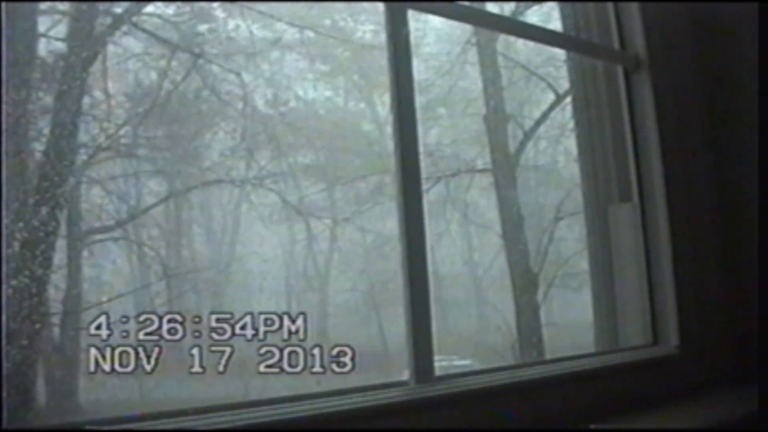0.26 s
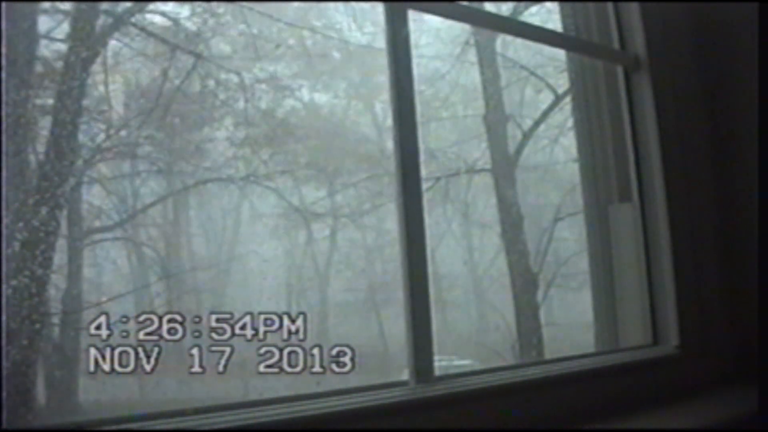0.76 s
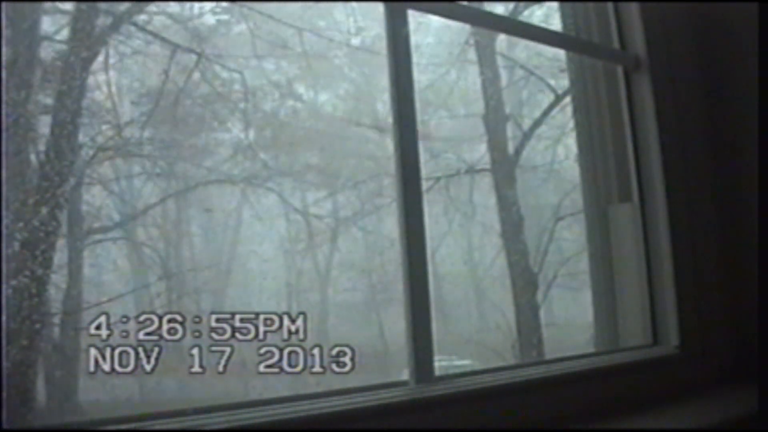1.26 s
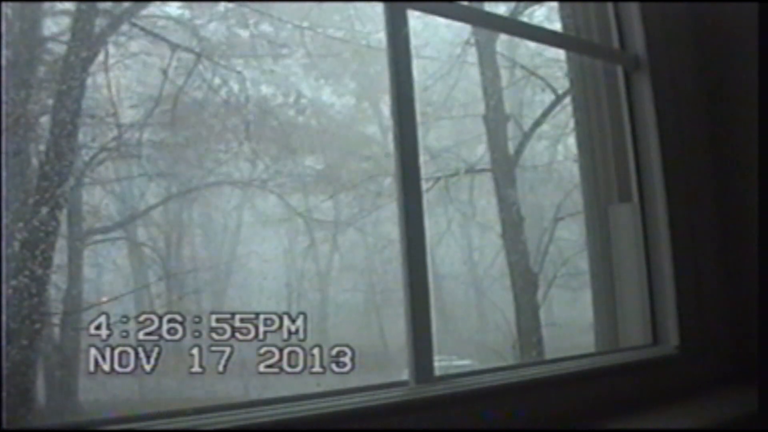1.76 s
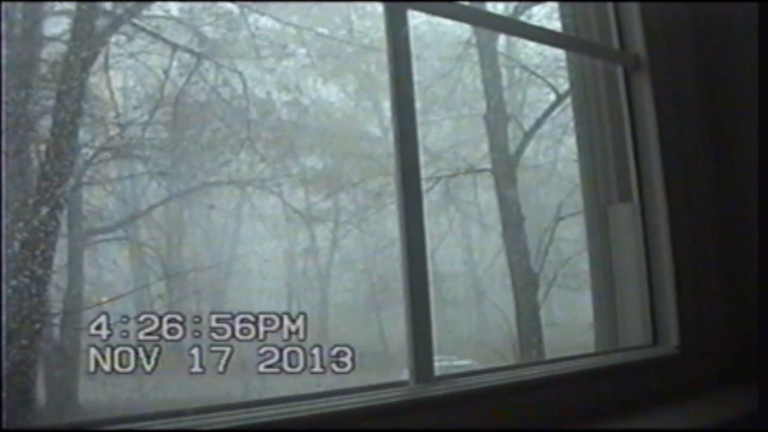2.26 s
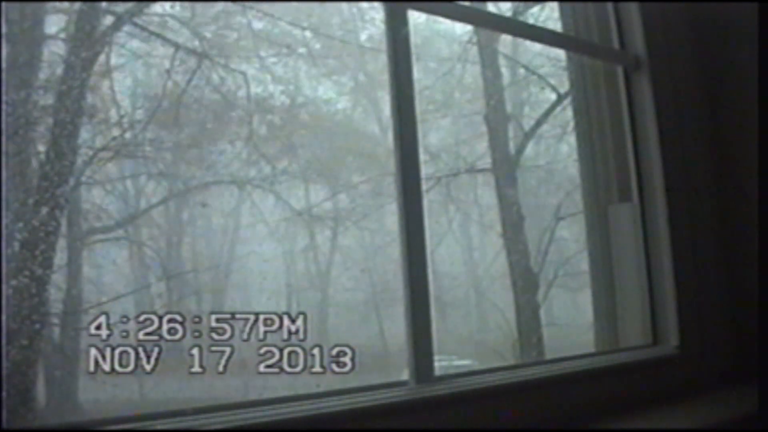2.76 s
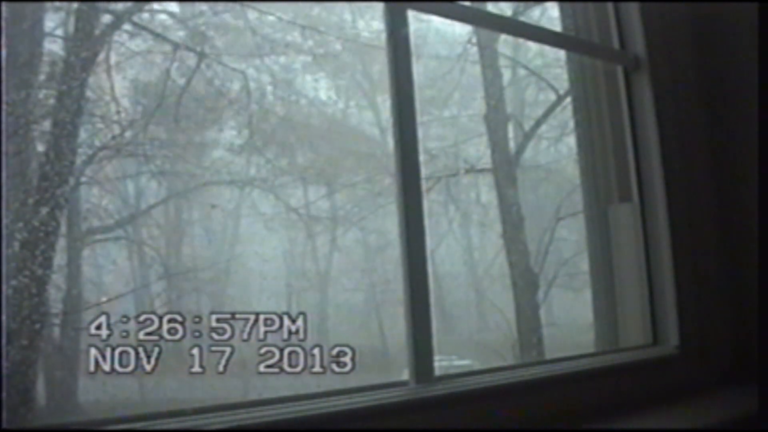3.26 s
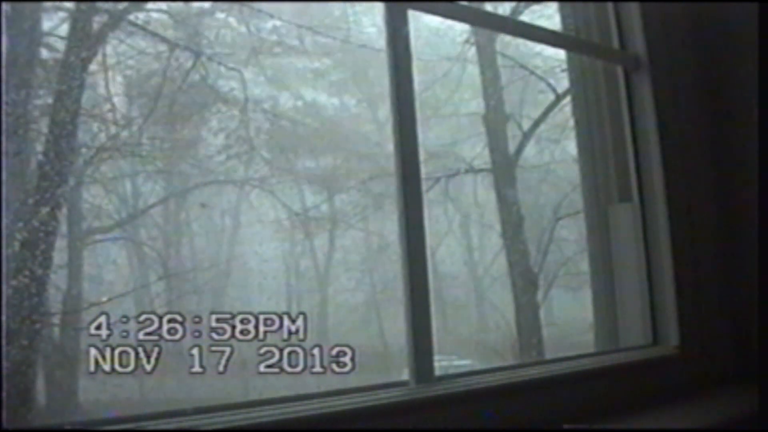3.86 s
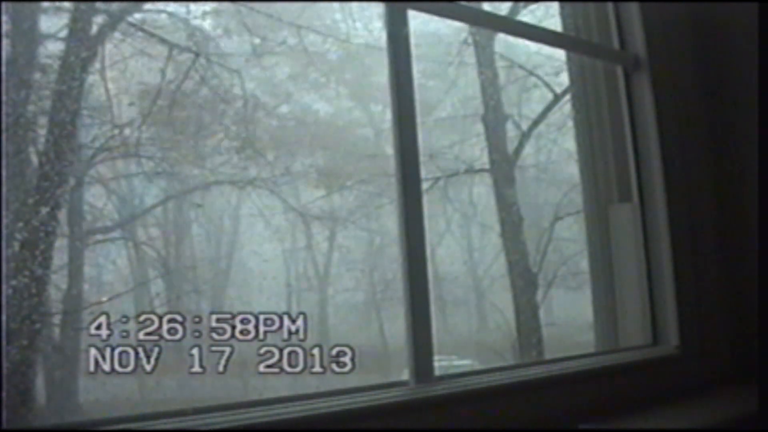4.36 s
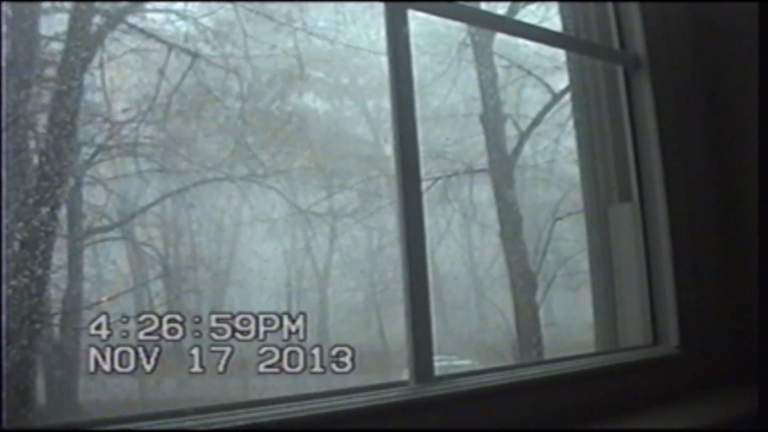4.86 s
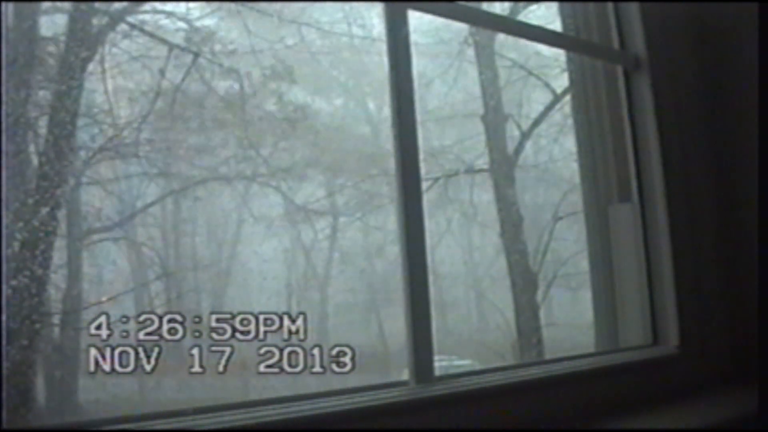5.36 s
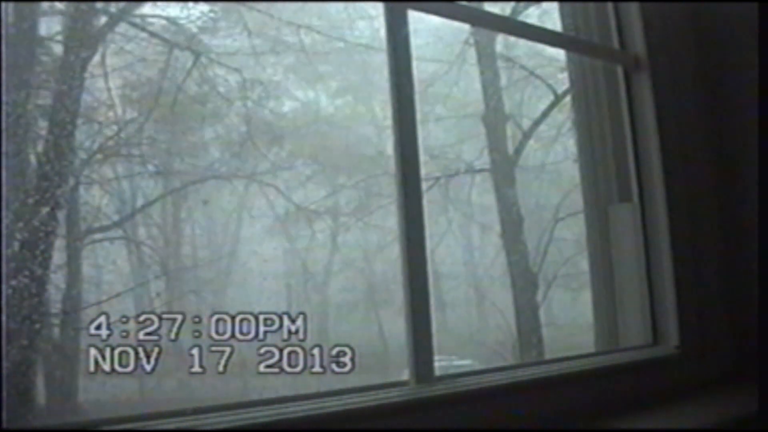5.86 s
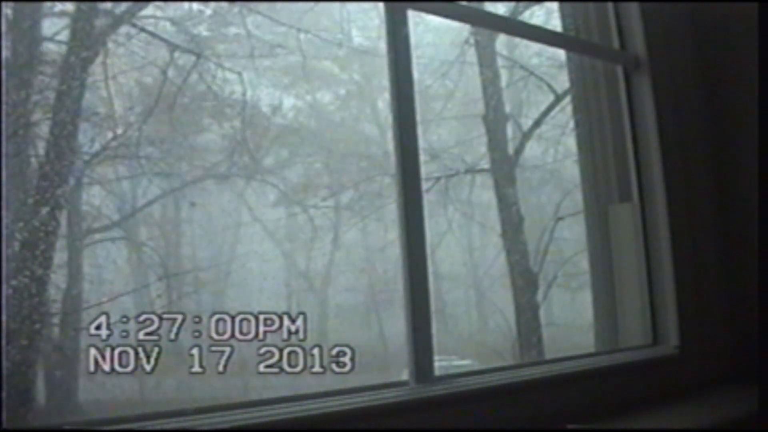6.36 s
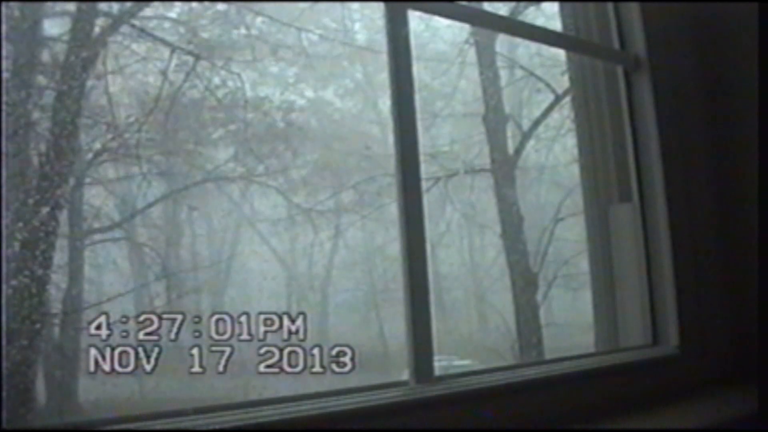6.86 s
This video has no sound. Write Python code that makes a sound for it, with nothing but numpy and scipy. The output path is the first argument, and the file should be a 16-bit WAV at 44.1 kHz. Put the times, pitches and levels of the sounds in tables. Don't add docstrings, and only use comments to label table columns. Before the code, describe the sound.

Steady strong wind heard through window glass, muffled and dark, already blowing at the start and still going at the end. Uneven buffets make the pane boom around a low-mid pitch, some short, some swelling for half a second. Breathier air whispers through gaps. Cheap camcorder sound: treble cut off, slightly watery and grainy, faint motor whine, nearly everything in the left channel, the right almost silent.

```python
import sys
import numpy as np
from scipy import signal
from scipy.fft import rfft, irfft
from scipy.io import wavfile
from scipy.ndimage import uniform_filter1d

SR = 44100
rng = np.random.default_rng(int(sys.argv[2]) if len(sys.argv) > 2 else 0)


def generate_wav(signal):
    frames = np.transpose(np.atleast_2d(signal))
    scaled = np.clip(frames, -1, 1) * 32767
    pcm = np.round(scaled).astype(np.int16)
    wavfile.write(sys.argv[1], SR, pcm)


def level_to_linear(level):
    exponent = np.asarray(level, float) / 20
    return 10 ** exponent


N = 313992

# (frequency [Hz], density [dB per Hz])
IDLE_HISS = [(20, 0), (150, -4), (1000, -11), (4000, -15), (10500, -18), (20000, -20)]
# (multiple of the rotation rate [1], level [dB rms])
GEAR_HARMONICS = [(14, -64.5), (16, -65.5), (18, -71), (19, -73), (20, -70), (21, -71.5)]
DRUM_HARMONICS = [(18, -63.5), (24, -75.5), (30, -72.5), (45, -77), (48, -81.5)]
# (frequency [Hz], level [dB rms])
CASE_TONES = [(1681.8, -70), (2043, -74), (3650, -76.5)]
# (time [s], level [dB])
WIND = [(0, -51.5), (.35, -52), (.85, -51.5), (1.7, -52), (2.6, -52), (3.3, -51.5), (3.75, -51.5),
        (4.25, -50), (4.6, -50.5), (5.3, -50), (6.0, -50.5), (6.3, -50.5), (7.0, -51.5), (7.12, -50.5)]
# (frequency [Hz], density [dB per Hz])
LEAK_SPECTRUM = [(530, -20.5), (900, -5.5), (967, -11.5), (1100, -2.5), (1600, -10.5), (1770, -8.5),
                 (1920, -12), (2080, -10), (2220, -11.5), (3080, -15.5), (4010, -13.5), (5630, -17.5),
                 (7100, -23), (9000, -26.5), (11300, -29.5)]
# (frequency [Hz], width [Hz], level [dB])
GLASS_MODES = [(347.3, 36, -3.5), (382.3, 23.5, 0), (405.8, 19, -1.5), (446.7, 25.8, -3), (474.3, 29, -8),
               (533.7, 43, -8), (603, 37.4, -9), (671, 77, -11.5), (728, 24, -27), (781.5, 34, -17.5),
               (802, 30, -20.5), (885, 66, -20.5)]
# (frequency [Hz], width [Hz], level [dB])
WALL_MODES = [(29.6, 8, -33), (50, 7.6, -24), (72.7, 34, -26), (95.5, 15.7, -9.5), (130, 17, -12),
              (155.9, 21, -4.5), (194.6, 19.3, -4.5), (211.1, 9.8, -1), (235.3, 25.6, -3.5), (269, 22, -5)]
# (frequency [Hz], width [Hz], level [dB])
PANE_MODES = [(292.9, 12.1, 3), (303.4, 18, 1), (319.5, 18.6, -4)]
# (centre time [s], added boom [dB], length [s])
BUFFETS = [(0.18, -28, 0.25), (0.424, -38.5, 0.64), (0.718, -33.5, 0.23), (0.958, -41.5, 0.21),
           (1.287, -42, 0.5), (1.05, -38, 0.12), (1.33, -39, 0.2), (1.49, -34, 0.23), (1.59, -26.5, 0.13),
           (1.75, -30, 0.15), (2.01, -35.5, 0.45), (2.31, -40.5, 0.55), (2.534, -30, 0.06),
           (3.148, -40.5, 0.96), (3.577, -35, 0.35), (3.886, -36, 0.69), (4.215, -37, 0.59),
           (4.225, -33, 0.07), (4.485, -35, 0.076), (4.674, -29.5, 0.36), (4.989, -36.5, 0.38),
           (5.268, -30, 0.25), (5.438, -35, 0.25), (5.63, -29, 0.28), (5.832, -32, 0.065),
           (5.981, -37.5, 0.36), (6.051, -40, 0.097), (6.221, -34, 0.16), (6.59, -36, 0.71),
           (6.77, -38.5, 0.098)]
# (centre time [s], step [dB])
SHORTAGES = [(0.149, -34.8), (0.181, -36.6), (0.213, -38.1), (0.309, -39.4), (0.693, -37.8), (0.757, -40.6),
             (1.493, -36.4), (1.557, -40.8), (1.589, -40.8), (1.621, -39.6), (1.845, -39.4), (1.877, -40.8),
             (1.941, -39.6), (2.197, -40.8), (2.261, -40.8), (2.325, -40.8), (2.389, -37.8), (2.549, -39.6),
             (3.093, -40.8), (3.189, -39.4), (3.221, -37.8), (3.349, -39.4), (3.477, -40.6), (3.541, -40.8),
             (3.573, -37.8), (3.669, -41.1), (3.765, -40.8), (3.861, -38.1), (3.925, -40.6), (3.957, -39.4),
             (4.053, -40.6), (4.181, -40.8), (4.341, -40.8), (4.373, -40.8), (4.469, -40.8), (4.501, -40.8),
             (4.597, -36.4), (4.629, -40.8), (4.661, -39.4), (4.693, -36.4), (4.789, -40.8), (4.853, -39.6),
             (5.045, -40.8), (5.237, -37.8), (5.301, -39.4), (5.365, -40.8), (5.429, -40.8), (5.493, -40.8),
             (5.557, -36.4), (5.589, -40.6), (5.685, -39.4), (5.813, -40.4), (6.037, -40.8), (6.069, -38.1),
             (6.229, -40.6), (6.357, -40.8), (6.517, -37.8), (6.677, -40.8), (6.773, -38.1), (6.901, -39.4)]


def rms_one(x):
    return x / np.sqrt(np.mean(x ** 2) + 1e-20)


def drift(rate):
    every = 40
    r = np.exp(-2 * np.pi * rate * every / SR)
    white = rng.standard_normal(N // every + 2002)
    slow = signal.lfilter([1], [1, -2 * r, r * r], white)[2000:]
    return np.interp(np.arange(N) / every, np.arange(len(slow)), rms_one(slow))


def tone(hz, level_db, wander_hz):
    turns = np.cumsum(hz + wander_hz * drift(1.4)) / SR + rng.random()
    return np.sqrt(2) * level_to_linear(level_db) * np.sin(2 * np.pi * turns)


def idle_input(live):
    corner = np.exp(-2 * np.pi * 330 / SR)
    crosstalk = level_to_linear(-62.5) * signal.lfilter([1, -1], [1, -corner], live)
    mains = tone(60, -100, wander_hz=0)
    hz, level_db = np.transpose(IDLE_HISS)
    bins_hz = np.arange(1, N // 2 + 2) * SR / N
    colour = level_to_linear(np.interp(np.log(bins_hz), np.log(hz), level_db))
    hiss = irfft(colour * rfft(rng.standard_normal(N)), N)
    return crosstalk + mains + level_to_linear(-86.5) * rms_one(hiss)


def motors():
    gear_hz, drum_hz = 129.68, 59.94
    turn_s, top_s, swing_db, sag_db_per_s = .583, .4, 6.0, .6
    s = np.arange(N) / SR
    swell_db = swing_db * np.cos(2 * np.pi * (s - top_s) / turn_s) - sag_db_per_s * (s - s.mean())
    gear = [tone(k * gear_hz, level_db, wander_hz=0.71) for k, level_db in GEAR_HARMONICS]
    gear[0] = gear[0] * level_to_linear(swell_db)
    drum = [tone(k * drum_hz, level_db + 3 * drift(4.3), wander_hz=0.33) for k, level_db in DRUM_HARMONICS]
    case = [tone(hz, level_db, wander_hz=.8) for hz, level_db in CASE_TONES]
    return sum(gear + drum + case)


def gale():
    wind_db = np.interp(np.arange(N) / SR, *np.transpose(WIND))
    return wind_db.mean(), wind_db - wind_db.mean()


def leaking_rush(mean_db, gust_db):
    steady_above_hz = 4500
    patchy_db, shared = 0.5, 0.98
    edges = 500 * 2 ** (np.arange(15) / 3)
    together = drift(5.8)
    white = rng.standard_normal((2, N))
    hz, level_db = np.transpose(LEAK_SPECTRUM)
    rush = 0
    for k, (low, high) in enumerate(zip(edges, edges[1:])):
        band = signal.sosfilt(signal.butter(2, [low, high], "band", fs=SR, output="sos"), white[k % 2])
        centre_db = np.interp(np.log(low * high) / 2, np.log(hz), level_db)
        follow_db = gust_db * min(1, steady_above_hz / high) ** 2
        flicker_db = patchy_db * (shared * together + drift(4.5))
        rush = rush + band * level_to_linear(centre_db + follow_db + flicker_db)
    return level_to_linear(mean_db + 0.87) * rms_one(rush)


def rung(modes):
    out = 0
    for hz, width, level_db in modes:
        r = np.exp(-np.pi * 1.5 * width / SR)
        gain = (1 - r * r) / 2
        section = [gain, 0, -gain, 1, -2 * r * np.cos(2 * np.pi * hz / SR), r * r]
        noise = rng.standard_normal(N + SR)
        out = out + level_to_linear(level_db) * signal.sosfilt([section, section], noise)[SR:]
    return rms_one(out)


def steadied(x, span_s, share):
    size = int(span_s * SR)
    power = uniform_filter1d(uniform_filter1d(x ** 2, size), size) + 1e-9
    return rms_one(x / power ** (share / 2))


def glass_howl(gust_db):
    return level_to_linear(-35.5 + 1.4 * gust_db) * steadied(rung(GLASS_MODES), 0.13, share=0.4)


def wall_rumble(gust_db):
    return level_to_linear(-33.5 + .6 * gust_db) * steadied(rung(WALL_MODES), 0.062, share=0.27)


def swells(rows, s):
    return sum(level_to_linear(db) * np.cos(np.pi * np.clip((s - at) / length, -.5, .5)) ** 2 for at, db, length in rows)


def pane_boom(gust_db):
    buffets = np.repeat(swells(BUFFETS, np.arange(0, N, 16) / SR), 16)[:N]
    flexing = level_to_linear(-35 + .3 * gust_db) + buffets
    return uniform_filter1d(flexing, size=32) * steadied(rung(PANE_MODES), 0.06, share=.8)


def storm():
    mean_db, gust_db = gale()
    rush = leaking_rush(mean_db, gust_db)
    mix = rush + glass_howl(gust_db) + wall_rumble(gust_db) + pane_boom(gust_db)
    return 2 * mix


def scene():
    live = motors() + storm()
    return np.array([live, idle_input(live)])


def starved(lines, s, hz):
    rest_db, rest_top_db, jitter_db, grain_db = -44.3, -42.2, 2.1, 1.5
    crisis_db, crisis_hz = -38.2, 6400
    wind_db = np.interp(s, *np.transpose(WIND))
    notches = np.round(jitter_db * rng.standard_normal(len(s)) / grain_db)
    step_db = np.minimum(rest_db + wind_db - wind_db.mean() + grain_db * notches, rest_top_db)
    at, short_db = np.transpose(SHORTAGES)
    nearest = np.abs(s[:, None] - at).argmin(axis=0)
    step_db[nearest] = short_db
    return np.where(np.outer(step_db > crisis_db, hz > crisis_hz), 1, level_to_linear(step_db)[:, None])


def generous(lines, s, hz):
    return np.sqrt(uniform_filter1d(np.mean(lines ** 2, axis=0), size=16)) * level_to_linear(-26)


def requantised(x, hop, grid, step_of):
    last_line_hz = 10500
    n = np.arange(2 * hop)
    line = np.arange(int(last_line_hz * 2 * hop / SR)) + .5
    window = np.sin(np.pi * (n + .5) / (2 * hop))
    basis = window[:, None] * np.cos(np.pi / hop * np.outer(n + .5 + hop / 2, line))
    basis = basis * np.sqrt(2 / hop)
    blocks = np.pad(x, (2 * hop - grid, -(N - grid) % hop + hop)).reshape(-1, hop)
    lines = np.hstack([blocks[:-1], blocks[1:]]) @ basis
    frame_s = (np.arange(len(lines)) * hop + grid - hop) / SR
    step = step_of(lines, frame_s, line * SR / (2 * hop))
    rounded = np.floor(np.abs(lines / step) ** .75 + .4054) ** (4 / 3)
    frames = (np.sign(lines) * rounded * step) @ basis.T
    return (frames[:-1, hop:] + frames[1:, :hop]).ravel()[hop - grid:][:N]


def roll_off(x):
    return signal.sosfilt(signal.butter(12, 10580, fs=SR, output="sos"), x)


def record(dry):
    coarse = requantised(dry[0], 1411, 962, starved)
    live = requantised(coarse, 1024, 62, generous)
    return roll_off(np.array([live, dry[1]]))


dry = scene()
out = record(dry)
generate_wav(out)
```